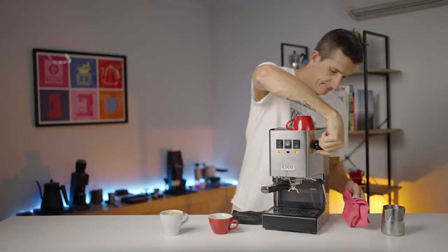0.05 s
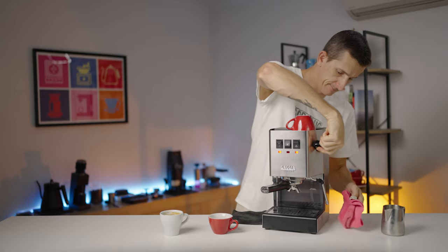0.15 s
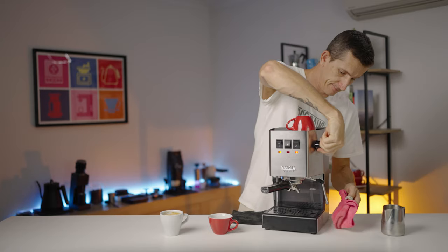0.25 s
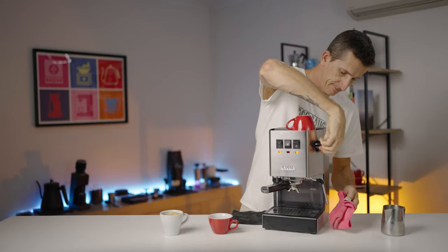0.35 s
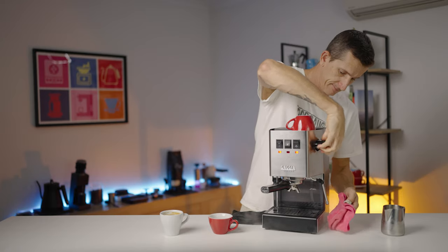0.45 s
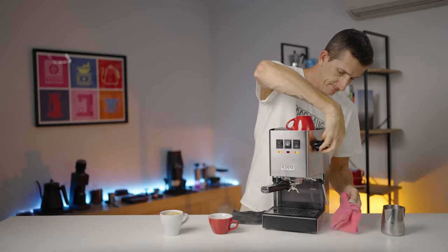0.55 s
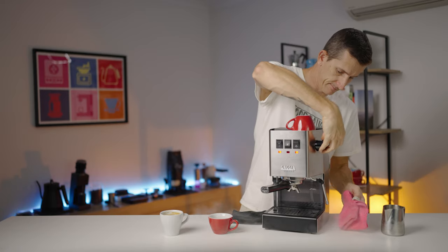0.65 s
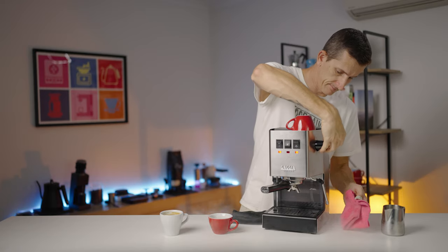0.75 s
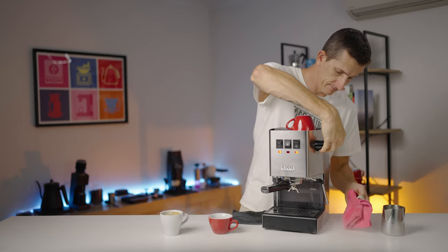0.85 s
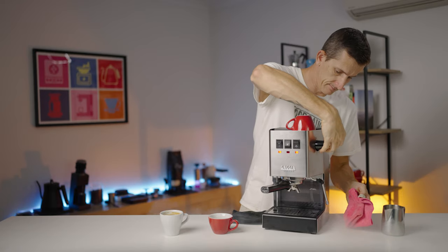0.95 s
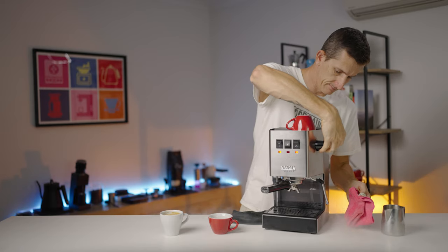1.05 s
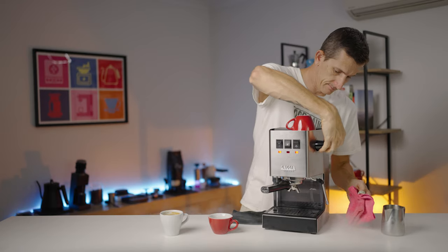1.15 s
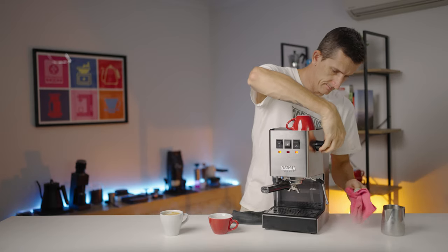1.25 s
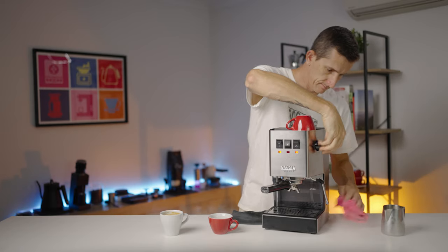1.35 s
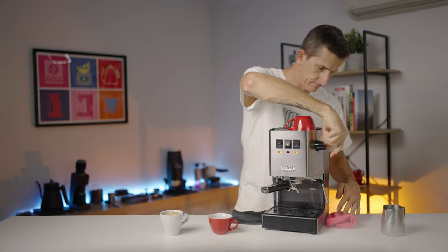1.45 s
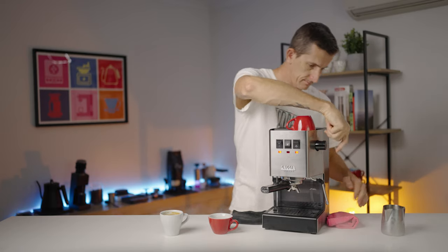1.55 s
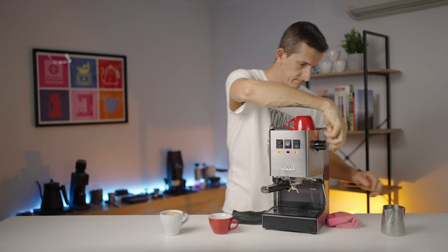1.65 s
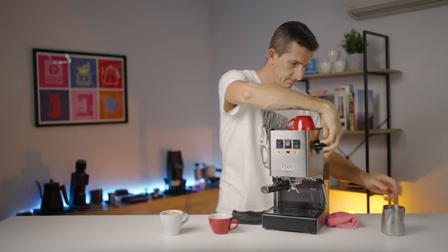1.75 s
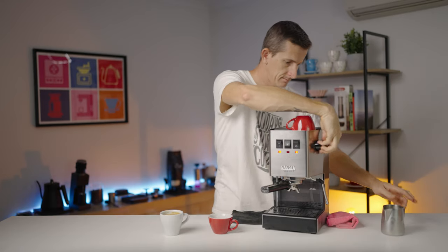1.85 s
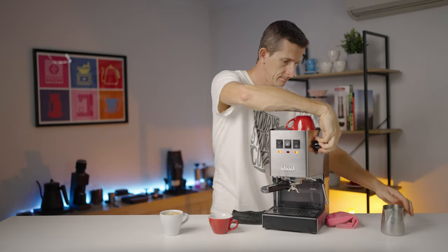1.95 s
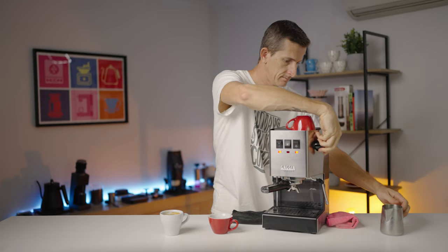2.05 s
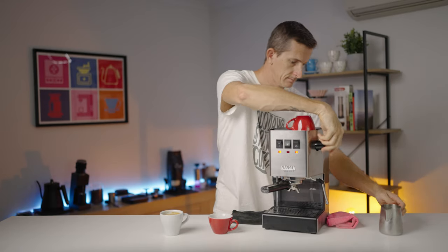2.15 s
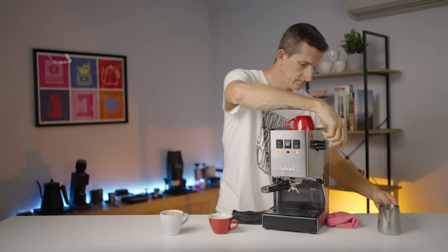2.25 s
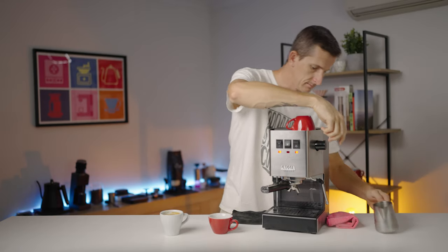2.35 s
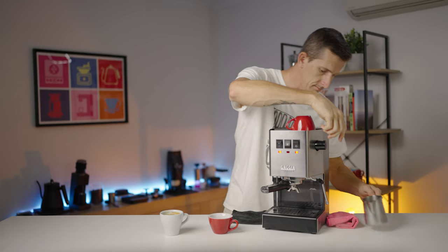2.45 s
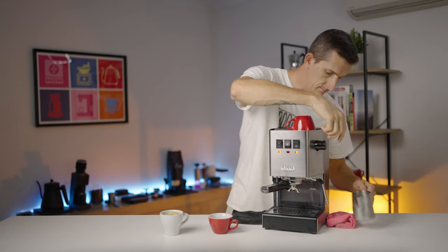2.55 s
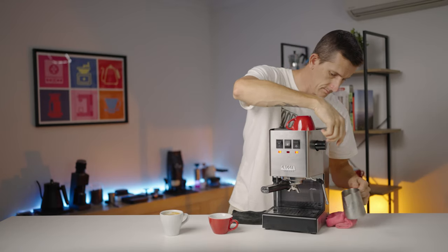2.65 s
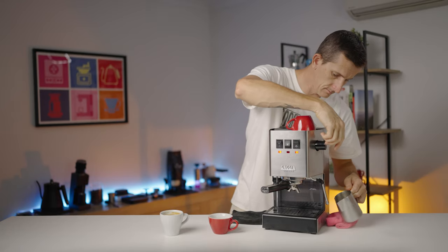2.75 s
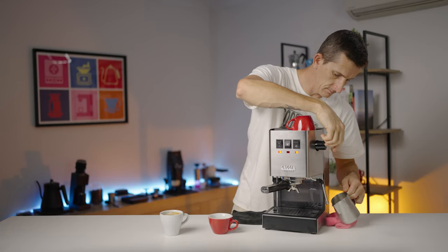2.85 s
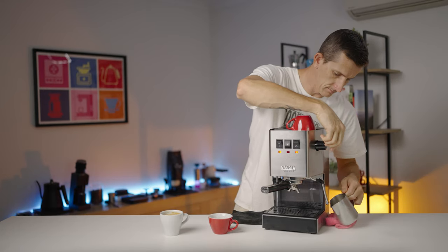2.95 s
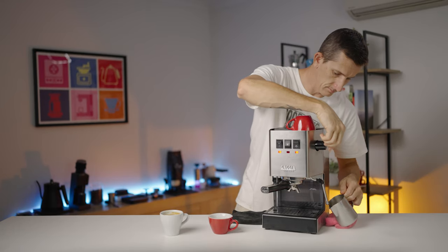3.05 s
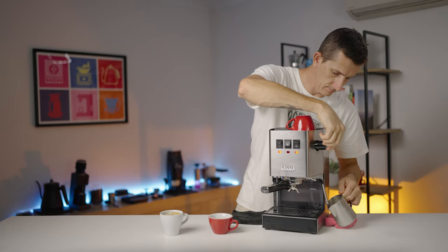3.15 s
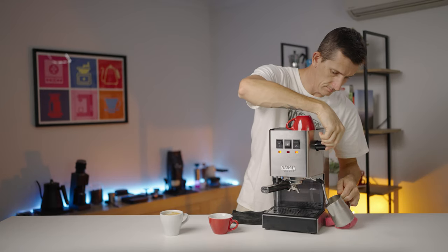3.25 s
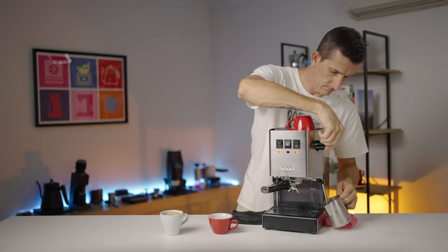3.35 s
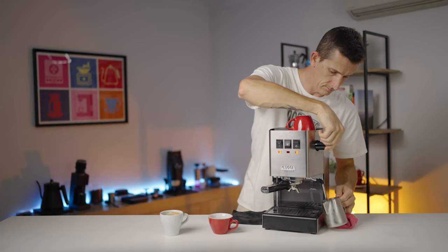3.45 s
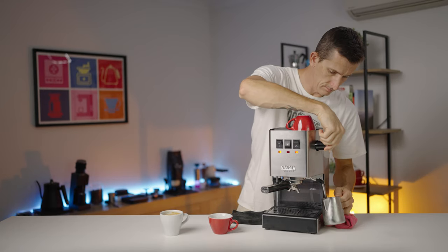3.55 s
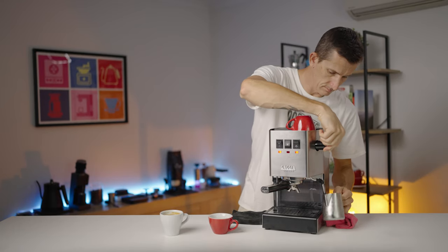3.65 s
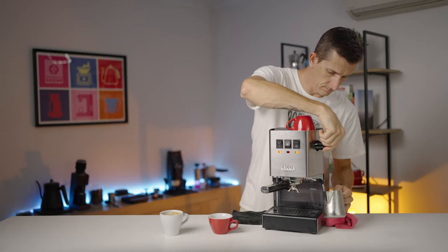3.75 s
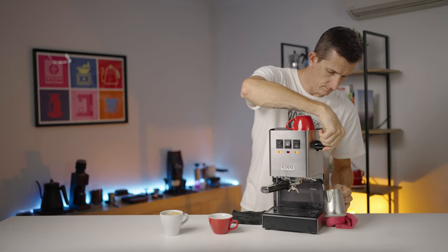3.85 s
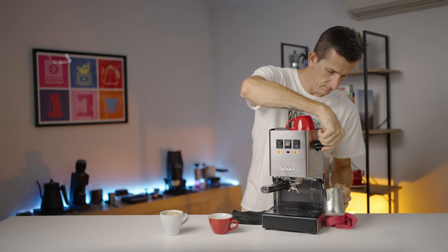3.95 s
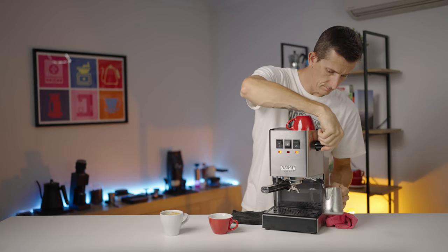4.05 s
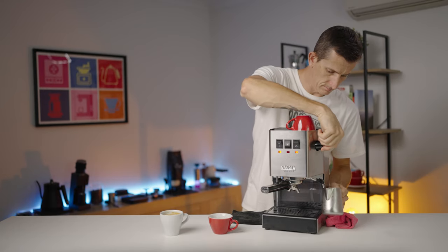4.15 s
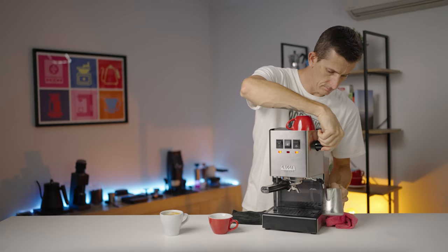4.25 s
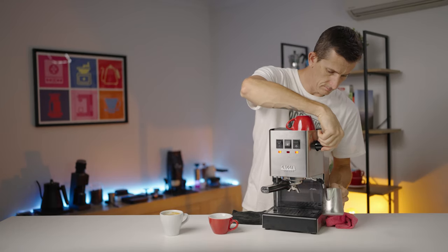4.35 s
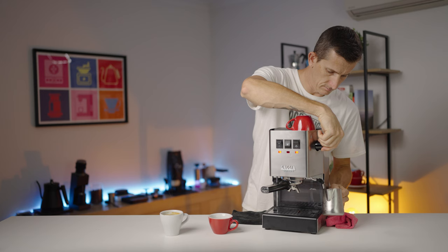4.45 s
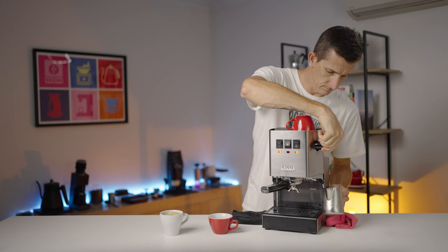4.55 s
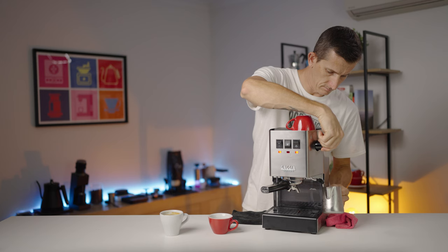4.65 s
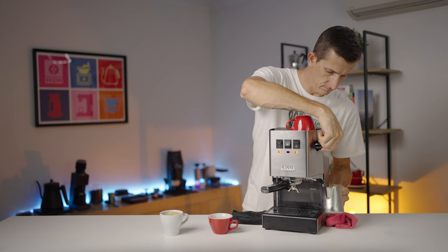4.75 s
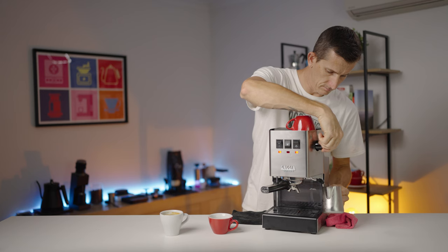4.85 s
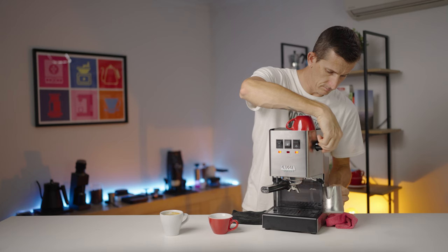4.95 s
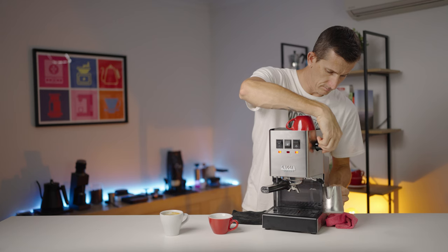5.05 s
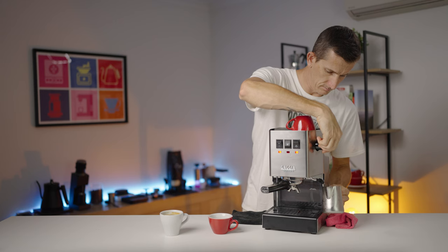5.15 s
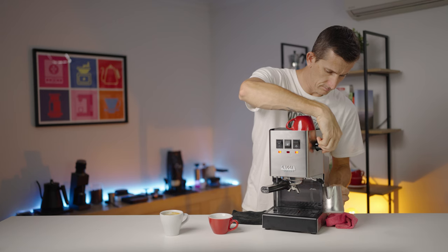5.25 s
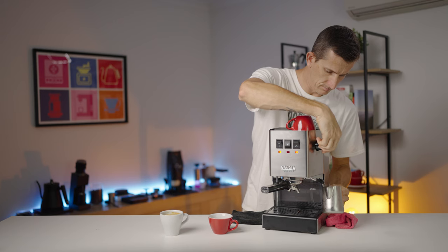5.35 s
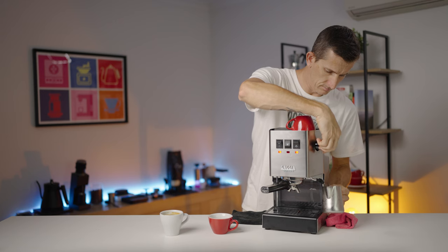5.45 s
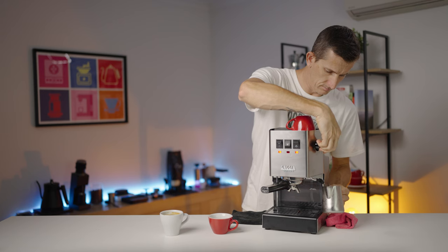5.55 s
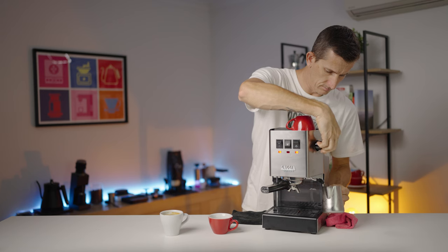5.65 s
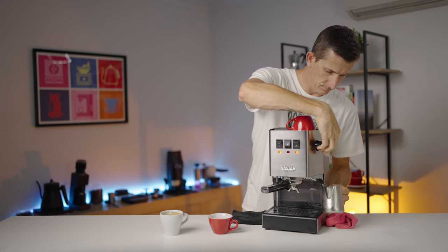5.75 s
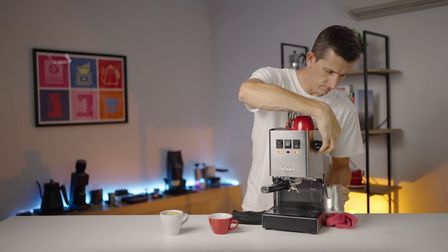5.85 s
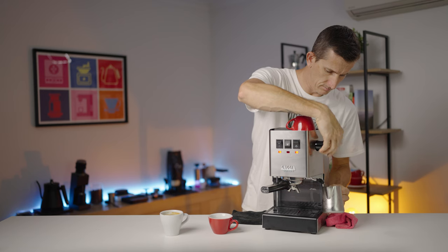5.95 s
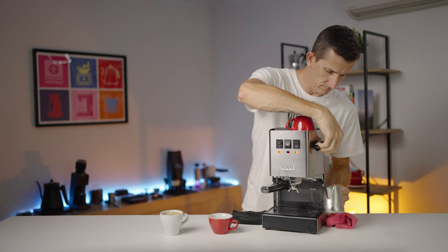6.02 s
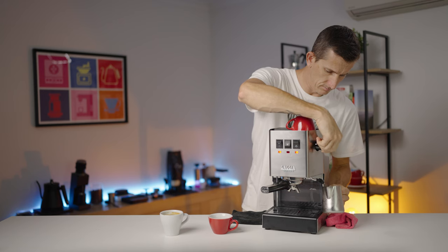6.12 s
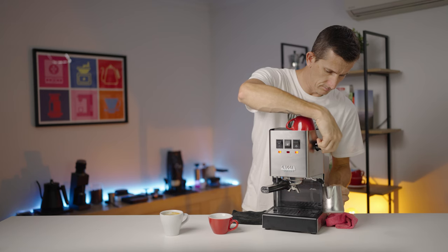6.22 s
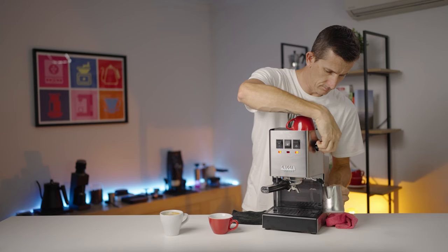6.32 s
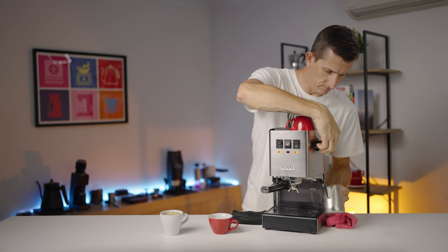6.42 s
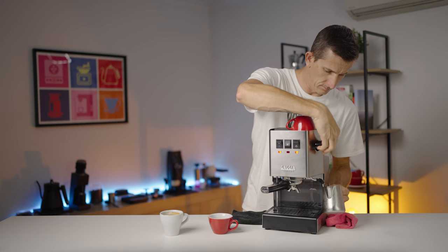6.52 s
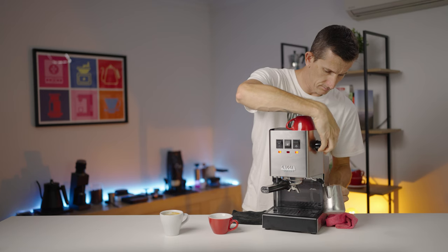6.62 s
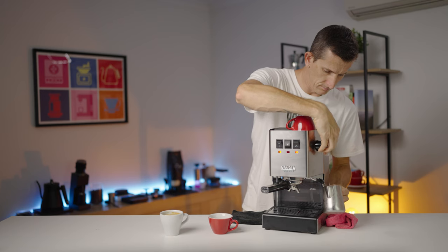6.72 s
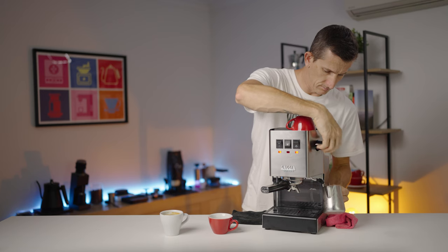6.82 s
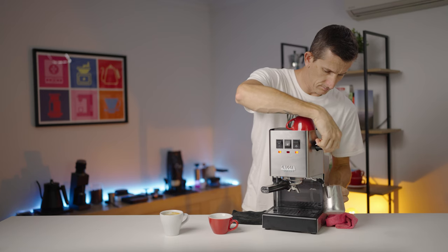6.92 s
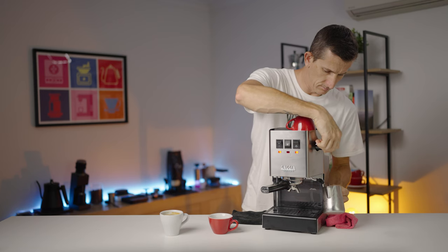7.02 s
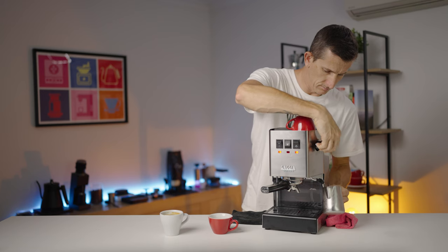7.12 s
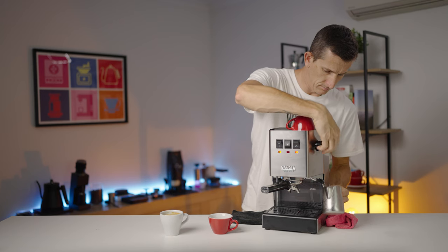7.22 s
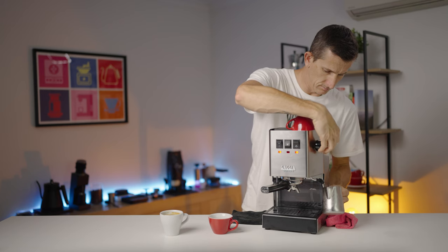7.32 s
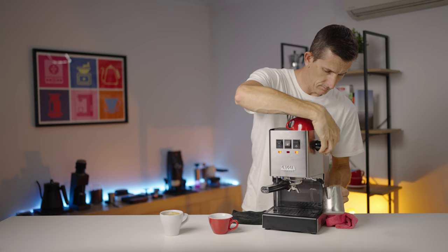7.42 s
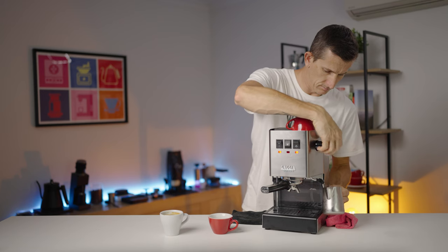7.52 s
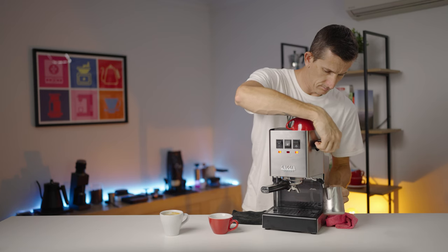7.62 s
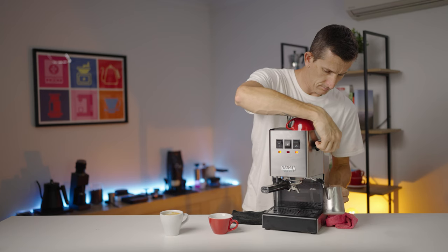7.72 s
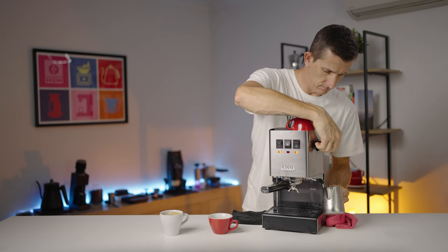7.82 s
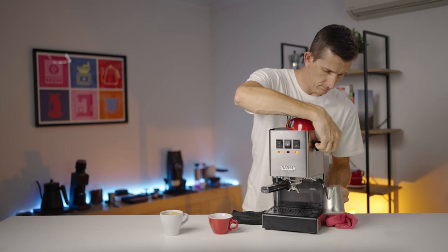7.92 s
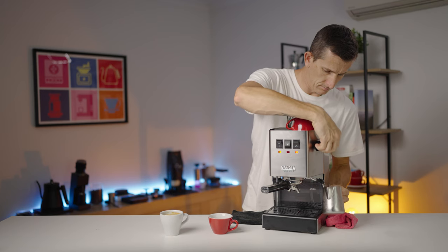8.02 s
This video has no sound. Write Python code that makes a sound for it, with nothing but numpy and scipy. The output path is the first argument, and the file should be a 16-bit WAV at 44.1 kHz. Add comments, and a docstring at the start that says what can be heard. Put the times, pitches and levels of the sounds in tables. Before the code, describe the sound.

A close, mono sound in a small, lightly reflective kitchen, with a faint low boiler rumble. Wet spits crackle at 0-0.3 s. From about 0.4 s steam hisses from an espresso machine's wand, growing in steps to its strongest near 1.2 s, with a cloth fluttering and a soft dull knock at 1.0; it weakens by 1.6 and shuts near 1.9. From 2.3 to 3.7 irregular watery sputters and tiny gurgles continue. At 3.85 a steel jug clinks rapidly against the wand, followed by sparse ticks and another spit at 4.5. Near 5.0 a bright jet bursts into the jug, with a brief high whistle and metallic air resonance. From 5.6 a rough, piercing screech grows, with sharp squeals from 6.0 to 7.7. Around 6.8 and after 7.2 come bubbly slurps; from 7.5 the hiss dips unevenly amid low gulps and hollow churning until the cut at 8.

```python
"""A steam jet hisses in a steel jug, screeches as its tip sinks into cold milk, and starts to churn it.
Before that the espresso machine's steam wand is purged into a cloth, dies away in sputters, and the jug
clinks against it; the boiler rumbles behind. Jets are shaped noise, bubbles random clicks through spectra,
steel a sum of decaying modes, screech and peeps resonated noise. A small room; one microphone."""
import sys
import numpy as np
from scipy import signal
from scipy.fft import rfft, irfft, next_fast_len
from scipy.io import wavfile
from scipy.ndimage import uniform_filter1d

SR = 44100
rng = np.random.default_rng(int(sys.argv[2]) if len(sys.argv) > 2 else 0)


def master_out(mix):
    """Clip the mix to full scale and print it as 16-bit PCM to the path in sys.argv[1]."""
    frames = np.transpose(np.atleast_2d(mix))
    ceiling = np.clip(frames, -1, 1)
    pcm = np.round(ceiling * 32767).astype(np.int16)
    wavfile.write(sys.argv[1], SR, pcm)


N = 356460
TIME = np.arange(N) / SR


def gain_of(db):
    """Decibels to amplitude."""
    return 10 ** (np.asarray(db) / 20)


def evened(x):
    """Scales to rms 1."""
    return x / np.sqrt(np.mean(x ** 2) + 1e-20)


def read(points, hz):
    """A spectrum's value at hz, on a log-frequency axis."""
    f, value = np.transpose(points)
    return np.interp(np.log(hz + 1), np.log(f + 1), value)


def follow(rows, t=TIME):
    """Each column of a curve at the times t."""
    s, *columns = np.transpose(rows)
    return [np.interp(t, s, c) for c in columns]


def during(rows):
    """1 while a curve lasts, with short fades outside it."""
    start, end = rows[0][0], rows[-1][0]
    return np.interp(TIME, [start - 0.02, start, end, end + 0.068], [0, 1, 1, 0])


def add(mix, s, sound):
    """Mixes a sound in at time s."""
    part = mix[max(round(s * SR), 0):][:len(sound)]
    part += sound[:len(part)]


def noise():
    """White noise over the whole scene."""
    return rng.standard_normal(N)


def coloured(x, colour):
    """Gives x a spectrum, at rms 1."""
    size = next_fast_len(N)
    gain = gain_of(read(colour, np.fft.rfftfreq(size, 1 / SR)))
    return evened(irfft(rfft(x, size) * gain, size)[:N])


def flutter(rate_hz, depth_db):
    """A random gain of mean power 1 that wanders at about rate_hz."""
    knots = np.clip(rng.standard_normal(N // 20), -2, 2)
    wander = np.interp(TIME * rate_hz, np.arange(len(knots)), knots)
    return evened(gain_of(depth_db * wander))


def pops(per_s, spread_db):
    """Random clicks of uneven size, at rms 1."""
    size = gain_of(spread_db * np.minimum(rng.exponential(1, N), 4))
    occurs = rng.random(N) < per_s / SR
    return evened(size * rng.choice([-1, 1], N) * occurs)


def resonate(x, hz, width_hz):
    """A one-pole resonance of gain 1; shifting x to 0 Hz and back lets hz follow a curve."""
    turn = np.exp(2j * np.pi * np.cumsum(hz * np.ones(len(x))) / SR)
    r = np.exp(-np.pi * width_hz / SR)
    return 2 * (turn * signal.lfilter([1 - r], [1, -r], x / turn + 1e-18)).real


def lift(resonances, hz):
    """The dB that a set of bell-shaped resonances adds at hz."""
    return sum(db * np.exp(-.5 * ((hz - centre) / width) ** 2) for centre, width, db in resonances)


def swell(middle_s, length_s):
    """A smooth rise from 0 to 1 and back."""
    return np.cos(np.pi * np.clip((TIME - middle_s) / length_s, -.5, .5)) ** 2


def opening(rows, rise_s):
    """A level curve in dB, reached from near silence over rise_s before its first point."""
    ramp = np.clip(1 + (TIME - rows[0][0]) / rise_s, 1e-6, 1)
    return follow(rows)[0] + 20 * np.log10(ramp)


def room(x, wet_db):
    """Adds dense reflections whose treble dies first; direct and reflected power together are kept."""
    # reverberation time: f/Hz, t60/s
    room_t60 = [(150, 0.13), (1000, 0.27), (5000, 0.3), (15000, 0.031)]
    hz, t, z = signal.stft(rng.standard_normal(SR // 2), SR, nperseg=256)
    decay = gain_of(-60 * t / read(room_t60, hz)[:, None])
    tail = signal.istft(z * decay, SR, nperseg=256)[1]
    tail[:90] = 0  # samples before the first reflection
    wet = gain_of(wet_db)
    reflected = signal.fftconvolve(x, tail / np.linalg.norm(tail))[:N]
    return (x + wet * reflected) / np.hypot(1, wet)


def mic_hiss():
    """The microphone's own faint, steady hiss."""
    return gain_of(-77) * coloured(noise(), [(3000, -5), (15000, -7)])


def boiler():
    """Bubbles collapsing in the boiler merge into a lumpy rumble that swells and dips."""
    # rumble spectrum: f/Hz, level/dB
    rumble_colour = [(30, -50), (55, -21), (95, -13.5), (140, 3), (190, -1.5), (250, 0.5), (320, -5),
                     (420, -1.5), (660, -21), (880, -12), (1500, -21), (2300, -44), (8000, -67)]
    # uneven swells and dips of the rumble: t/s, change/dB
    changes = [(2.19, 4.5), (2.38, 4), (2.66, 7), (2.78, 5), (3.08, -1), (3.21, 2.5), (3.35, 7),
               (3.42, 4.5), (3.52, 6.5), (3.65, 4.5), (3.74, 4), (3.87, 0.5), (4.04, 4.5), (4.18, 5.5),
               (4.31, 4), (4.42, 2), (4.65, 5), (4.85, 7)]
    level_db, period_s, reach_s = -49.5, 0.16, 0.05
    change_db = np.zeros(N)
    for s, db in changes:
        lag = TIME - s
        change_db += db * np.cos(2 * np.pi * lag / period_s) * np.exp(-(lag / reach_s) ** 2)
    rumble = coloured(pops(per_s=900, spread_db=1.5), rumble_colour)
    return gain_of(level_db + change_db) * rumble * flutter(rate_hz=45, depth_db=2.0)


def knocks():
    """A soft blow booms briefly in the machine's casing."""
    # dull knocks: t/s, level before trim/dB, f/Hz
    blows = [(1.042, -25, 140)]
    trim_db, rise_s = -4.0, 0.0097
    out, t = np.zeros(N), TIME[:SR // 4]
    for s, db, hz in blows:
        u = t / rise_s
        add(out, s, gain_of(db + trim_db) * u * np.exp(1 - u) * np.sin(2 * np.pi * hz * t))
    return room(out, wet_db=-7)


def peeps():
    """Short narrow-band steam sounds, from a low gurgle to thin whistles: noise through two resonances."""
    # steam sounds: t/s, level/dB, f/Hz, length/s
    peep_rows = [(2.55, -53, 3380, 0.056), (2.684, -67, 8800, 0.068), (3.145, -52.5, 2930, 0.069),
                 (3.341, -41.5, 1210, .1), (4.93, -69, 6000, .022), (5.11, -27, 5300, .07),
                 (6.165, -31, 5380, 0.062)]
    out = np.zeros(N)
    for s, db, hz, length in peep_rows:
        envelope = np.hanning(round(length * SR))
        tone = resonate(rng.standard_normal(len(envelope)), hz, 180)
        add(out, s, gain_of(db) * envelope * evened(resonate(tone, hz, 260)))
    return out


def sputter():
    """Water in the wand crackles, with a stronger spit now and then."""
    # crackle spectrum: f/Hz, level/dB
    crackle_colour = [(250, -63), (500, -10.5), (680, -5), (950, -1.5), (1400, -3), (2000, -4), (2750, -6),
                      (4000, -16), (6000, -24.5), (8400, -28.5), (10000, -41), (15000, -52)]
    # spits of water and steam: t/s, level before trim/dB, attack/s, t60/s
    spit_rows = [(0.0, -31.5, 0.0043, 0.32), (0.064, -36, .006, 0.22), (0.17, -32, .01, 0.5),
                 (0.245, -31.5, 0.013, 0.48), (2.335, -28, .012, 0.27), (2.47, -32, 0.0068, 0.42),
                 (2.528, -34.5, .008, 0.33), (2.765, -28, 0.028, 0.27), (2.9704, -30.5, .001, 0.31),
                 (3.065, -31.5, .005, 0.45), (3.128, -39, .006, 0.21), (3.266, -36, .001, 0.26),
                 (3.298, -35, 0.0057, 0.47), (3.372, -29.5, 0.0088, 0.44), (3.5055, -40, .001, 0.055),
                 (3.575, -33, 0.006, 0.17), (3.709, -31.5, 0.0058, 0.28), (4.135, -46, .001, .1),
                 (4.2825, -39.5, 0.0011, 0.13), (4.407, -42.5, .001, 0.17), (4.495, -31, .002, 0.37),
                 (4.73, -55.5, .001, 0.16), (4.815, -51, .001, 0.2)]
    # water simmering in the wand, which cools after the purge: t/s, level before trim/dB
    simmer_level = [(0.0, -51), (0.58, -48.5), (1.07, -41), (1.38, -44), (1.55, -49), (2.12, -44.5),
                    (2.66, -56.5), (3.83, -60.5), (4.25, -67.5), (4.95, -70)]
    spit_trim_db, simmer_trim_db = -13.5, -3.0
    spits, t = np.zeros(N), TIME[:SR // 3]
    for s, db, attack, t60 in spit_rows:
        decay = gain_of(db + spit_trim_db - 60 * t / t60)
        add(spits, s, decay * np.minimum(t / attack, 1))
    simmer = gain_of(follow(simmer_level)[0] + simmer_trim_db) * during(simmer_level)
    crackle = coloured(pops(per_s=4600, spread_db=4.0), crackle_colour)
    return room(crackle * np.hypot(simmer, spits), wet_db=-7)


def purge():
    """The free jet hisses; at full pressure it also buffets the cloth."""
    # jet spectrum: f/Hz, level/dB
    jet_colour = [(300, -30), (1500, -6.5), (3000, -1), (4500, 1), (5900, 3.5), (7000, 4.5), (7900, -3.5),
                  (8480, 8.5), (9050, -2.5), (9700, 3.5), (11300, -1.5), (12200, 1), (13000, -2.5),
                  (15700, -5.5)]
    # buffeted cloth spectrum: f/Hz, level/dB
    cloth_colour = [(50, -35), (90, -16), (135, -3), (235, 4), (330, -0.5), (520, 7), (720, -1), (900, 3),
                    (1400, -4), (2300, -4), (5000, -45.5)]
    # free jet as the hand opens the valve in stages and shuts it: t/s, level/dB
    purge_flow = [(0.37, -45), (0.44, -41), (0.52, -40), (0.77, -34.5), (0.99, -36), (1.015, -31.5),
                  (1.21, -29), (1.47, -30.7), (1.59, -38), (1.87, -41)]
    rise_s, bleed_db_per_s = 0.03, 34  # valve cracking open; leftover steam bleeding away
    # cloth against jet; below the knee it loses this many more dB per dB
    buffet_db, knee_db, fall_db_per_db = -7, -38.5, 2.5
    jet = coloured(noise(), jet_colour) * flutter(rate_hz=150, depth_db=0.76)
    cloth = coloured(noise(), cloth_colour) * flutter(rate_hz=80, depth_db=1.6)
    bleed_db = bleed_db_per_s * np.maximum(TIME - purge_flow[-1][0], 0)
    jet_db = opening(purge_flow, rise_s) - bleed_db
    cloth_db = jet_db + buffet_db - fall_db_per_db * np.maximum(knee_db - jet_db, 0)
    return jet * gain_of(jet_db) + cloth * gain_of(cloth_db)


def clinks():
    """Each touch rings the hand-damped jug, with a rasp of steel on steel; the wand shimmers on faintly."""
    # jug touching wand: t/s, level before part levels/dB, share of contact noise
    touches = [(3.839, -26.5, 0.71), (3.852, -24.5, 0.53), (3.866, -33.5, 0.58), (3.889, -31.5, 1),
               (4.129, -56, 0.59), (4.653, -57, 0.26)]
    # jug wall modes: f/Hz, level/dB, t60/s
    jug_modes = [(890, -1.5, 0.2), (1628, -4, 0.14), (1740, -11, .12), (1805, -7, 0.13), (2880, -14, 0.23),
                 (2910, 0.5, 0.2), (3060, -9, .1), (3690, -12, .15), (3994, -18, 0.14), (4730, -4, 0.078),
                 (5120, -4, 0.1), (5389, -13, 0.18), (5722, -12, 0.23), (6600, -9, 0.11), (6850, -14, .16),
                 (8200, -19, .16), (8700, -15, 0.37), (9711, -22, .15), (9900, -10, 0.16)]
    ring_db, rasp_db, shimmer_db = -11.0, -5, -57
    out, t = np.zeros(N), TIME[:SR]
    wand_hz = rng.uniform(4400, 8300, size=40)
    rasp_band = signal.butter(2, [220, 7500], "band", fs=SR)
    for s, db, contact in touches:
        grip = rng.uniform(.985, 1.015)  # pitch factor
        ring = sum(gain_of(level - 60 * t / t60) * np.sin(2 * np.pi * (hz * grip * t + rng.random()))
                   for hz, level, t60 in jug_modes)
        rasp = signal.lfilter(*rasp_band, rng.standard_normal(len(t))) * gain_of(-60 * t / .15)
        shimmer = sum(np.sin(2 * np.pi * (hz * t + rng.random())) for hz in wand_hz)
        shimmer = shimmer * gain_of(-60 * t / 1.5)
        touch = gain_of(ring_db) * ring + gain_of(rasp_db) * contact * rasp + gain_of(shimmer_db) * shimmer
        add(out, s, gain_of(db) * touch)
    return room(out, wet_db=-6.0)


def slurps():
    """The tip breaks the surface and sucks in a short, bubbly gulp of air."""
    # air gulps: t/s, level/dB, f/Hz, width/Hz
    air_gulps = [(6.83, -38, 1600, 1090), (7.189, -44.5, 930, 600), (7.37, -45, 1270, 1100),
                 (7.459, -54, 1090, 695), (7.618, -42, 1010, 800), (7.903, -38.5, 1840, 1100)]
    attack_s, t60_s = 0.0039, 0.41
    out, t = np.zeros(N), TIME[:SR // 5]
    for s, db, hz, width in air_gulps:
        bubbles = pops(per_s=3300, spread_db=2.5)[:len(t)]
        froth = evened(resonate(resonate(bubbles, hz, width), hz, width))
        add(out, s, gain_of(db) * froth * np.minimum(t / attack_s, 1) * gain_of(-60 * t / t60_s))
    return out


def churn():
    """With each heave large bubbles gulp under the surface while the whirl's hollow rings near one note."""
    # milk heaves: t at the middle/s, length/s, large bubbles level/dB, hollow note level/dB
    heaves = [(7.471, 0.056, -53.5, -38), (7.632, 0.064, -48, -43), (7.7, 0.12, -36, -40),
              (7.77, 0.058, -37, -45.5), (7.837, 0.1, -41, -35), (7.958, 0.16, -68, -34),
              (8.054, 0.14, -50, -43)]
    gulp_colour = [(110, -37), (200, 2.0), (440, 3.5), (620, -7.5), (1200, -16), (4000, -71)]  # f/Hz, level/dB
    gulp_gain = sum(gain_of(db) * swell(s, length) for s, length, db, _ in heaves)
    hollow_gain = sum(gain_of(db) * swell(s, length) for s, length, _, db in heaves)
    gulps = coloured(pops(per_s=760, spread_db=2.0), gulp_colour)
    hollow = resonate(pops(per_s=1500, spread_db=2.5), hz=1040, width_hz=170)
    hollow = evened(resonate(hollow, hz=1050, width_hz=700))
    return room(gulps * gulp_gain + hollow * hollow_gain, wet_db=-5)


def choke_db():
    """The dB by which the whirling milk, closing over the tip, holds the jet back."""
    # chokes: t at the middle/s, length/s, dip/dB
    chokes = [(7.603, .08, 5), (7.785, 0.12, 10), (7.91, 0.2, 8.5)]
    return sum(db * swell(s, length) for s, length, db in chokes)


def screech():
    """Steam pockets collapse in quick uneven bursts, ringing near one pitch; the sharpest squeal alone."""
    # ringing pitch: t/s, f/Hz
    screech_pitch = [(5.6, 2600), (5.95, 2890), (6.85, 2830), (7.25, 2950), (7.5, 2870), (7.7, 3350),
                     (8.08, 3300)]
    # steam collapsing in cold milk: t/s, level before trim and chokes/dB
    screech_level = [(5.55, -39.5), (6.03, -26.5), (6.35, -25.5), (6.5, -28), (6.87, -26.5), (7.2, -27),
                     (7.5, -32), (7.69, -30), (7.78, -40.5), (8.08, -48)]
    # single sharp collapses: t/s, level before trim/dB, f/Hz
    squeals = [(6.0012, -11, 2924), (6.056, -9.5, 2910), (6.236, -13, 2840), (6.294, -7, 2820),
               (6.348, -14, 2760), (6.6, -8, 2875), (6.8314, -6.5, 2820), (6.853, -8, 2820),
               (6.867, -8, 2760), (6.946, -12, 2860), (6.981, -6, 2794), (7.1152, -22, 3010),
               (7.17, -21, 2900), (7.3061, -13.5, 3040), (7.5373, -8, 2930), (7.5756, -13.5, 3420),
               (7.608, -12.5, 2944), (7.663, -11.5, 3160), (7.6834, -7.5, 3350), (7.869, -15.5, 3260)]
    trim_db, squeal_trim_db, squeal_rise_s = -2.6, -10.0, 0.0038
    pitch_hz = follow(screech_pitch)[0]
    band = noise()
    for width_hz in (260, 1100, 1500):
        band = resonate(band, pitch_hz, width_hz)
    level_db = opening(screech_level, rise_s=0.072) - 0.57 * choke_db() + trim_db
    out = evened(band) * flutter(rate_hz=140, depth_db=2.0) * gain_of(level_db)
    t = TIME[:SR // 20]
    for s, db, hz in squeals:
        u = t / squeal_rise_s
        add(out, s, gain_of(db + squeal_trim_db) * (u * np.exp(1 - u)) ** 2 * np.sin(2 * np.pi * hz * t))
    return room(out, wet_db=-8.0)


def jet_in_jug():
    """The jet's hiss is shaped by its plume and by the air in the jug, which rings less as the tip sinks."""
    # hiss spectrum: f/Hz, level/dB
    hiss_colour = [(100, -48), (700, -13), (2100, -27), (3300, 6), (3950, -1), (4500, -2), (6500, -0.5),
                   (7300, -1), (9700, -1), (12900, -1.5), (15700, -10)]
    # jet: t/s, level before trim and chokes/dB, treble tilt before chokes/(dB/octave)
    jet_flow = [(5.01, -28.5, 1), (5.3, -29.5, 0.8), (5.9, -28, 2.2), (6.3, -30, 3), (6.53, -29, 2.5),
                (6.84, -25, -1.5), (7.35, -32, 2.5), (7.58, -38, -2.5), (7.83, -31, 4.5),
                (8.08, -35.5, -1.5)]
    # plume: t/s, factor on its resonances, their strength, tip depth 0-1, how freely the jug rings
    plume_rows = [(5.05, 1.11, 0.34, 0, 0.93), (5.3, 1.11, 0.34, 0, 1), (5.55, 1.004, 0.32, 0.06, 1),
                  (5.9, 0.99, 1, 0.4, 1), (6.3, 1, 1, 0.45, 0.77), (6.65, 1.017, 0.6, 0.85, 0.87),
                  (7.3, 1.018, 0.84, 1, 0.57), (7.7, 0.97, 0.17, 1, 0.17), (8.08, 0.96, .05, 1, 0.16)]
    # plume resonances near the surface: f/Hz, half width/Hz, lift/dB
    shallow_bands = [(5500, 730, 14.5), (8200, 500, 22.5), (11660, 570, 7)]
    # plume resonances deep in the milk: f/Hz, half width/Hz, lift/dB
    deep_bands = [(4540, 310, -6), (5630, 620, 18), (8280, 250, 12), (9300, 250, 9), (10680, 610, 12),
                  (14350, 790, 12)]
    # resonances of the air in the jug: f/Hz, half width/Hz, lift/dB
    jug_air = [(2930, 70, 10), (2960, 27, 7), (3290, 28, 6), (4280, 126, 13), (4640, 55, 14),
               (5100, 18, 17), (5150, 16, 8), (5295, 35, 14), (5650, 19, 14), (5780, 16, 11.5),
               (5990, 21, 8), (6030, 42, -17), (6310, 20, 14), (6700, 31, 8), (7220, 45, 6.5),
               (7760, 54, 4), (7690, 42, 6.5), (8070, 18, 5), (8760, 50, 5), (10900, 43, 9),
               (11350, 27, 11), (11770, 110, 10)]
    # jet on the milk's surface, strong at first, later weak and uneven: t/s, level before trim/dB
    surface_level = [(5.0, -42), (5.05, -38), (5.48, -40), (5.7, -47.5), (6.0, -54.5), (6.35, -51.5),
                     (7.2, -50.5), (7.6, -59), (8.08, -52)]
    # surface spectrum: f/Hz, level/dB
    surface_colour = [(100, -48), (300, -15), (700, -11), (870, 5), (950, -0.5), (1060, 3.5), (1450, -1.5),
                      (1620, 2), (1900, -7.5), (2150, -10.5), (2900, 1), (5000, -51)]
    rise_s, trim_db, surface_trim_db = 0.033, 0.58, 3.0
    choke_tilt = 0.61  # dB/octave of treble lost per dB of choke
    air_drift = 0.165  # share of the plume's pitch drift that the jug air follows

    hz, t, z = signal.stft(noise(), SR, nperseg=2048, noverlap=1536)
    hz = hz[:, None]
    shift, strength, depth, ring = follow(plume_rows, t)
    plume_db = (1 - depth) * lift(shallow_bands, hz / shift) + depth * lift(deep_bands, hz / shift)
    air_db = lift(jug_air, hz / shift ** air_drift)
    tilt = follow(jet_flow, t)[1] - choke_tilt * np.interp(t, TIME, choke_db())
    tilt_db = tilt * np.log2(np.maximum(hz, 2000) / 7000)
    # the moving milk keeps shifting the finer peaks and gaps
    ripple = uniform_filter1d(rng.standard_normal(z.shape), size=5, axis=0)
    ripple_db = 2.8 * evened(uniform_filter1d(ripple, size=14, axis=1))
    shape = gain_of(read(hiss_colour, hz) + tilt_db + strength * plume_db + ring * air_db + ripple_db)
    shape = shape / np.linalg.norm(shape, axis=0)  # equal power in each frame
    hiss = evened(signal.istft(z * shape, SR, nperseg=2048, noverlap=1536)[1][:N])
    hiss_db = opening(jet_flow, rise_s) - choke_db() + trim_db
    hiss = hiss * flutter(rate_hz=120, depth_db=0.47) * gain_of(hiss_db)
    surface_db = opening(surface_level, rise_s=0.028) + surface_trim_db
    surface = coloured(noise(), surface_colour) * gain_of(surface_db)
    return room(hiss + surface, wet_db=-11)


def scene():
    """All sources reach one microphone, the same in both channels."""
    machine = boiler() + knocks() + peeps() + sputter() + purge()
    jug = clinks() + slurps() + churn() + screech() + jet_in_jug()
    mono = mic_hiss() + machine + jug
    return np.array([mono, mono])


def record(dry):
    """The microphone's low cut, then the band limit."""
    low_cut_hz, edge_hz = 60, 15750
    cut = signal.sosfilt(signal.butter(2, low_cut_hz, "high", fs=SR, output="sos"), dry)
    band_limit = signal.firwin(1023, edge_hz, window=("kaiser", 9), fs=SR)
    return signal.oaconvolve(cut, band_limit[None], "same")


dry = scene()
out = record(dry)
master_out(out)
```